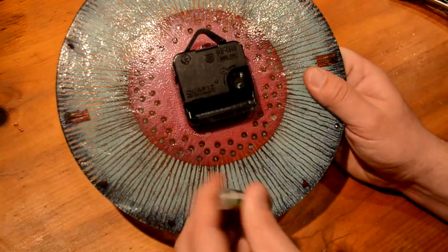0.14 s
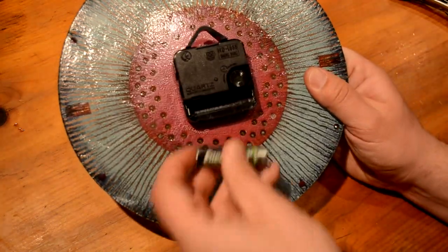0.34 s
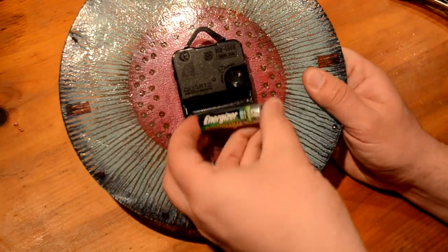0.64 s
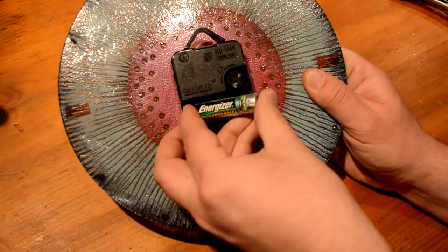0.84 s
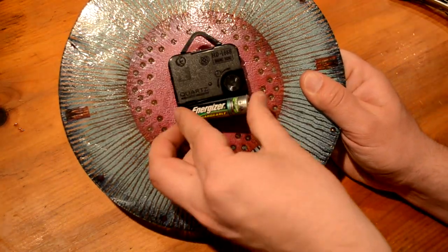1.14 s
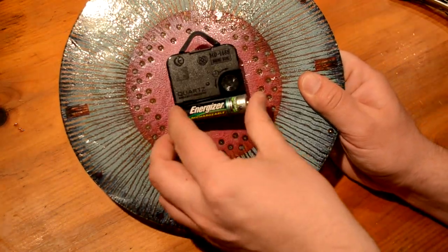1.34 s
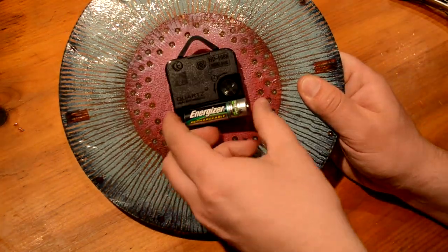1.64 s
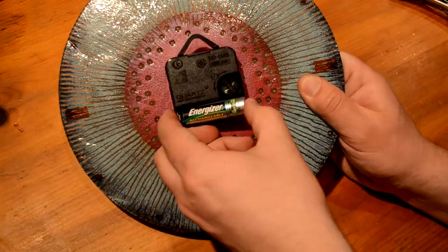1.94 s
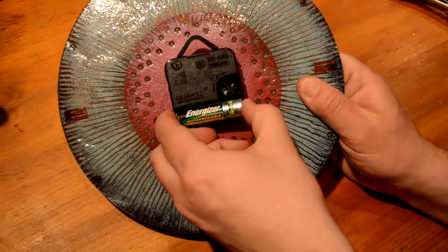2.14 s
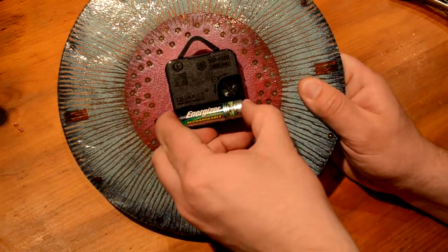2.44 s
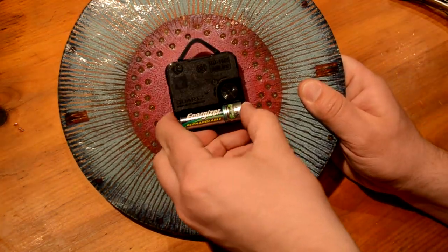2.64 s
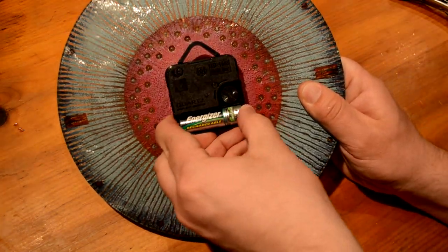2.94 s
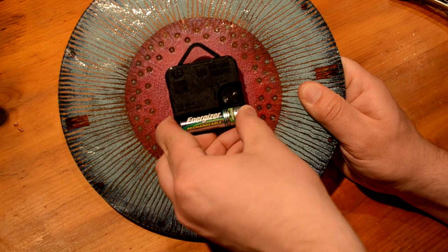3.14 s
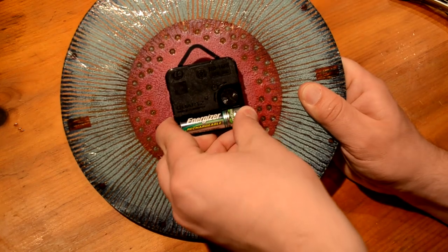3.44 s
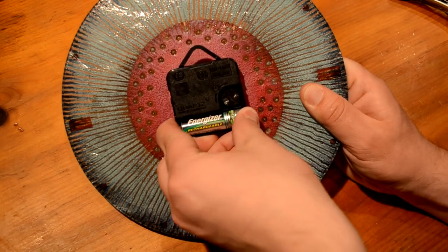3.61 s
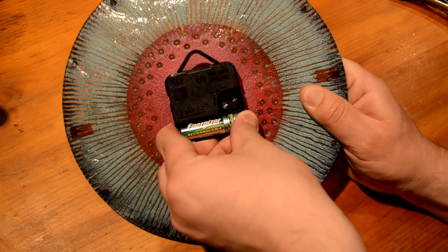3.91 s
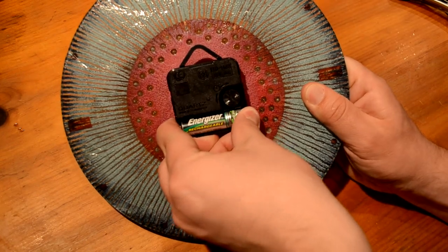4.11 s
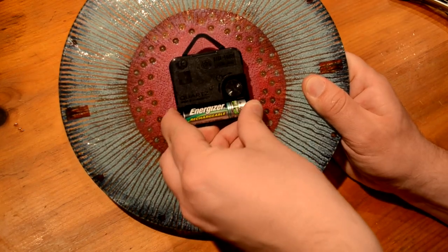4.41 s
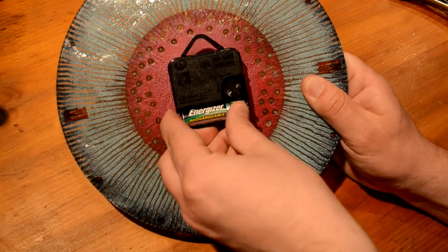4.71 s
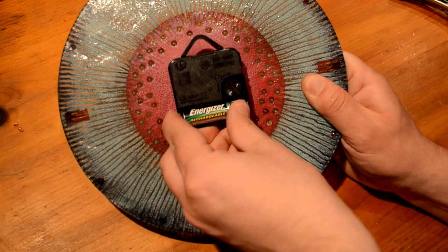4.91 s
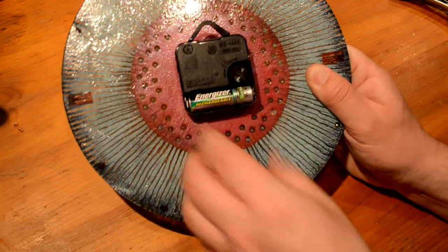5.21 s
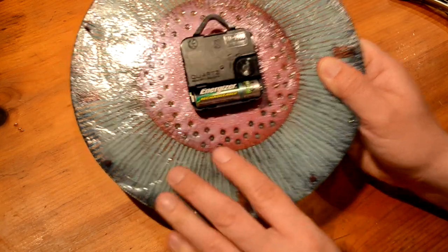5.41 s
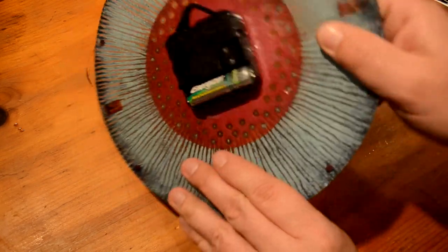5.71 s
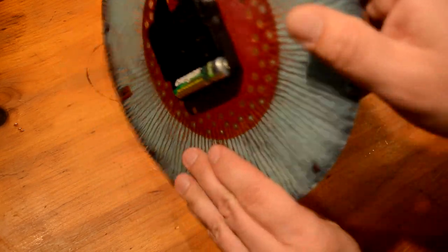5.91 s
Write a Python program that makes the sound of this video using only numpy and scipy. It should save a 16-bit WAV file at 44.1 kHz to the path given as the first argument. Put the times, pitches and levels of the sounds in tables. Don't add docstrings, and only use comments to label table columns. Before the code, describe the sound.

Fingers fumble a battery into a plastic clock case fixed to a ceramic dish held over a wooden bench. Dry, hand-muffled knocks and sharp plastic and spring clicks arrive at uneven spacing, the loudest about two thirds through, rocking the rim softly on wood. Quiet clicks follow, then a small glazed ring at the end. Close microphone, short small-room reflections, steady low fan noise, thin high whine and a receding motor drone.

```python
import sys
import numpy as np
from scipy import signal
from scipy.fft import rfft, irfft, next_fast_len
from scipy.io import wavfile
from scipy.ndimage import map_coordinates

SR = 44100
rng = np.random.default_rng(int(sys.argv[2]) if len(sys.argv) > 2 else 0)


def convert_level_to_amplitude(level_db):
    exponent = np.asarray(level_db, float) / 20
    return 10 ** exponent


def master(y):
    cut = np.clip(np.atleast_2d(y).T, -1, 1)
    pcm = np.round(cut * 32767)
    wavfile.write(sys.argv[1], SR, pcm.astype(np.int16))


N = 267246


def unit(x):
    return x / np.sqrt(np.mean(x ** 2) + 1e-20)


def along(points, hz):
    point_hz, value = np.transpose(points)
    return np.interp(np.log(hz + 1), np.log(point_hz + 1), value)


def filtered(x, response):
    m = next_fast_len(len(x) + 2048)
    return irfft(rfft(x, m) * response(np.fft.rfftfreq(m, 1 / SR)), m)[:len(x)]


def resonance(f, hz, width_hz):
    return 1j * f * width_hz / (hz * hz - f * f + 1j * f * width_hz)


def ring(modes, t, scatter_db):
    luck = rng.standard_normal(len(modes))
    total = 0
    for (hz, level_db, t60_s), u in zip(modes, luck):
        total = total + convert_level_to_amplitude(level_db + scatter_db * u - 60 * t / t60_s) * np.sin(2 * np.pi * hz * t)
    return total


def room(x, wet_db, scatter):
    # hz, t60_s
    room_decay = [(200, 0.28), (1000, 0.19), (4000, 0.19), (9000, 0.19), (15000, 0.11)]
    hz, t, z = signal.stft(rng.standard_normal(len(x)), SR, nperseg=256)
    fade = convert_level_to_amplitude(-60 * t / along(room_decay, hz)[:, None]) + scatter * convert_level_to_amplitude(-60 * t / 0.033)
    tail = signal.istft(z * fade, SR, nperseg=256)[1][:len(x)]
    tail = tail * np.clip(np.arange(len(tail)) / SR / .006 - .5, 0, 1)
    return x + convert_level_to_amplitude(wet_db) * signal.fftconvolve(x, tail / np.linalg.norm(tail))[:len(x)]


def add(track, start_s, x):
    track[round(start_s * SR):][:len(x)] += x


def background():
    # hz, level_db (per Hz)
    air_color = [(12, -33.5), (20, -3), (22, -14.5), (42, -30), (66, -10), (124, -2), (357, -7), (445, -7),
                 (889, -7), (966, -2.5), (1270, -7), (2930, -17), (5690, -30.5), (13100, -39),
                 (15000, -63.5)]
    # pitch_hz, width_hz, level_db
    fan_bands = [(967, 63, -69.5), (2954, 190, -77), (3466, 55, -79.5), (1203, 43, -79.5), (212, 28, -77)]
    # pitch_hz, level_db (rms)
    steady_tones = [(118.4, -80), (15665, -77.0)]
    # time_s, level_db
    drone_path = [(0.0, -65.5), (0.15, -63.5), (0.29, -60), (0.99, -65), (1.79, -69), (2.13, -71),
                  (2.34, -71.5), (4.39, -73), (6.06, -75)]

    def noise(response):
        return unit(filtered(rng.standard_normal(N), response))

    t = np.arange(N) / SR
    drone_db = np.interp(t, *np.transpose(drone_path))
    air_db = -60.4 + 0.083 * (drone_db - drone_db.mean())
    sway_db = 0.8 * map_coordinates(rng.standard_normal(30), [4 * t])
    air = noise(lambda f: convert_level_to_amplitude(along(air_color, f)))
    fan = sum(convert_level_to_amplitude(db) * noise(lambda f: resonance(f, hz, width) ** 2) for hz, width, db in fan_bands)
    drone = noise(lambda f: resonance(f, 150, 36) ** 2 + 0.21 * resonance(f, 62, 40) ** 2)
    tones = sum(np.sqrt(2) * convert_level_to_amplitude(db) * np.sin(2 * np.pi * hz * t) for hz, db in steady_tones)
    return convert_level_to_amplitude(air_db - 0.02) * air + convert_level_to_amplitude(air_db + 60.5) * fan + convert_level_to_amplitude(drone_db + sway_db) * drone + tones


def knocked_dish():
    # start_s, peak_db, bowl_hz, upper_db, hold_s (until the hand stops the tone)
    touches = [
        (0.684, -22.5, 796, -2.5, 0.0096),
        (0.7372, -38.5, 805, -6, 0.0068),
        (.8727, -35, 860, -12, 0.0041),
        (1.1139, -20.5, 840, -2, 0.0054),
        (1.1205, -32, 800, -19, 0.008),
        (3.067, -53, 990, 10, 0.014),
        (5.0794, -43.5, 856, 2, 0.0037),
        (5.0951, -53, 816, 3, 0.0057),
    ]
    # start_s, peak_db, bowl_hz, upper_db, hold_s
    pushes = [(1.4393, -16.5, 912, -2.5, 0.0046), (1.4425, -30, 760, -19, 0.013),
              (2.3636, -27, 923, -5.5, 0.0042), (2.4944, -9, 802, -3.5, 0.01),
              (2.499, -35, 802, 24.5, .004), (3.2055, -23.5, 960, -2.5, 0.0056),
              (3.9756, 1.5, 839, -0.5, 0.0076), (4.2337, -35.5, 830, 10, 0.01),
              (4.2947, -35, 856, 0.5, 0.0084), (4.5197, -36, 836, -2.5, 0.008),
              (5.9688, -41.5, 788, -3, 0.009)]
    # start_s, peak_db, bowl_hz
    fumbles = [
        (1.02, -45, 863),
        (1.029, -41.5, 830),
        (1.0591, -43, 950),
        (1.08, -47, 1010),
        (1.098, -47, 910),
        (3.1875, -41.5, 850),
        (3.213, -52, 912),
        (3.23, -50, 1000),
    ]
    # pitch_hz, level_db, t60_s
    upper_modes = [(1432, 12, 0.006), (1063, -18, 0.099), (1283, -16.5, 0.052), (1515, -23.5, 0.029),
                   (1620, -19, 0.046), (1800, -24, 0.12), (2079, -23.5, 0.032), (2230, -18.5, 0.02)]
    # pitch_hz, level_db, t60_s
    thud_modes = [(121.8, -13.5, 0.016), (254, -9, 0.083), (343, 3, 0.055), (384, 3.5, 0.023),
                  (450, 0.5, 0.074), (489, 1, 0.1), (605, -9, .04)]
    # pitch_hz, level_db, t60_s
    linger_modes = [(769, -4.5, .15), (775.3, -4.5, .2), (802, -4.5, .18), (830, -5.5, 0.33),
                    (829, -11.5, 0.46), (876, -2.5, 0.39), (857, -9.5, 0.26), (926, 5.5, 0.13),
                    (950, -7, 0.18)]
    touch_thud_db, push_thud_db = -28.5, -21
    fumble_upper_db, fumble_hold_s = 0.5, 0.0071

    def bowl(f):
        return (1j * f / (420 + 1j * f)) ** 2

    out, t = np.zeros(N + SR), np.arange(SR * 2 // 7) / SR
    light = touches + [(*row, fumble_upper_db, fumble_hold_s) for row in fumbles]
    knocks = [(*row, push_thud_db) for row in pushes] + [(*row, touch_thud_db) for row in light]
    for start_s, peak_db, bowl_hz, upper_db, hold_s, thud_db in knocks:
        rise = 1 - np.exp(-t / 0.00095)
        grip = 1 / (1 + (t / max(hold_s, .002)) ** 8)
        tone = grip * (1 - np.exp(-t / .0013)) * np.sin(2 * np.pi * bowl_hz * t)
        upper = convert_level_to_amplitude(upper_db - 0.5) * ring(upper_modes, t, scatter_db=4.0)
        thud = convert_level_to_amplitude(thud_db - 9) * ring(thud_modes, t, scatter_db=1.5)
        loosened = [(hz, db, t60_s * convert_level_to_amplitude(0.34 * peak_db)) for hz, db, t60_s in linger_modes]
        linger = convert_level_to_amplitude(-24 + 0.22 * peak_db) * (1 - grip) * ring(loosened, t, scatter_db=4.5)
        knock = filtered(rise * (tone + upper + linger), bowl) + rise * thud
        add(out, start_s, -convert_level_to_amplitude(peak_db - 2.0) * room(knock, wet_db=-12.5, scatter=0.046))
    return out[:N]


def holder():
    # start_s, case_hz, case_db, metal_db
    clicks = [(0.684, 3070, -42, -65), (1.0590, 4760, -52.5, -66), (1.0996, 3000, -55, -57),
              (1.1124, 2520, -66, -62), (1.437, 4660, -35.5, -42), (1.441, 3100, -35.5, -33.5),
              (2.363, 3230, -45.5, -47.5), (2.495, 2730, -18.5, -13), (2.5012, 1876, -17.5, -34),
              (3.0674, 4800, -65, -74), (3.2061, 2240, -30.5, -38.5), (3.9746, 4100, -37, -50),
              (3.9760, 3575, -11.5, -12), (4.2335, 1920, -34.5, -38.5), (4.2958, 3450, -45.5, -67),
              (5.0795, 2300, -52, -68), (5.0931, 2090, -46.5, -67), (5.9681, 3180, -45.5, -50),
              (5.099, 4890, -65, -71)]
    spring, contact = (5700, 5500, 5000), (11500, 11000, 7400)
    out, t = np.zeros(N + SR), np.arange(SR // 6) / SR
    for start_s, case_hz, case_db, metal_db in clicks:
        contact_db = 1.5 + 1.25 * metal_db
        levels = case_db, metal_db, contact_db
        shapes = [(case_hz, 1.2 * case_hz, case_hz), spring, contact]
        chatter = 0.31 * convert_level_to_amplitude(-60 * t / 0.01) * rng.standard_normal(len(t))
        for level_db, (hz, width_hz, ring_hz) in zip(levels, shapes):
            def body(f):
                return resonance(f, hz, width_hz) ** 4 + 1.6 * resonance(f, ring_hz, 930) ** 2

            crack = filtered(-1. * (t == 0), body)
            click = room(crack, wet_db=-3.5, scatter=2.5) + filtered(chatter, body)
            add(out, start_s, convert_level_to_amplitude(level_db - 1.5) / np.abs(crack).max() * click)
    return out[:N]


def scuffs():
    # start_s, length_s, level_db
    rubs = [
        (1.02, .09, -73),
        (3.068, 0.031, -69),
        (5.049, 0.016, -74),
        (5.079, .03, -70),
    ]
    # pitch_hz, width_hz, level_db
    skin_color = [(1430, 1440, 4), (2600, 480, -19), (4550, 300, -2)]
    slips_per_s, slip_scatter_db = 500, 2
    slips = np.zeros(N)
    for start_s, length_s, level_db in rubs:
        at, size, side = rng.random((60, 3))[:round(slips_per_s * length_s)].T
        strength = convert_level_to_amplitude(level_db + 31 - slip_scatter_db * np.log(size))
        slips[((start_s + at * length_s) * SR).astype(int)] += strength * (1 - at) * np.sign(side - .5)
    rub = filtered(slips, lambda f: sum(convert_level_to_amplitude(db) * resonance(f, hz, width) ** 2 for hz, width, db in skin_color))
    echo = room(np.eye(1, SR // 8)[0], wet_db=-3, scatter=1.4)
    return rub + signal.fftconvolve(rub, echo)[:N]


def bench():
    # start_s, peak_db
    bumps = [
        (1.4385, -58),
        (2.495, -62),
        (3.189, -58),
        (3.9752, -37),
        (4.003, -36.5),
        (4.017, -34),
    ]
    # pitch_hz, level_db, t60_s
    bump_modes = [(55, -4, 0.015), (119.33, -2.5, 0.0099), (242, -0.5, 0.02), (344, -2.5, .05),
                  (450, 1.5, 0.1)]
    out, t = np.zeros(N + SR), np.arange(SR // 6) / SR
    for start_s, peak_db in bumps:
        bump = (1 - np.exp(-t / 0.0017)) * ring(bump_modes, t, scatter_db=3)
        add(out, start_s, -convert_level_to_amplitude(peak_db) * room(bump, wet_db=-15.5, scatter=.3))
    return out[:N]


def tapped_dish():
    # start_s, peak_db
    taps = [
        (5.9690, -41.5),
        (6.049, -57),
    ]
    # pitch_hz, level_db, t60_s
    free_modes = [(1857, 2, 0.1), (1887, -4, 0.24), (1955, -0.5, 0.034), (3000, -17, 0.047),
                  (3230, -14, 0.18), (4450, -7, 0.026), (5060, -11, 0.036), (5620, -11, .015),
                  (5940, -18, .03), (6700, -30, .05), (7400, -14.5, 0.044), (8930, -33, 0.05)]
    out, t = np.zeros(N + SR), np.arange(SR * 2 // 7) / SR
    for start_s, peak_db in taps:
        tap = ring(free_modes, t, scatter_db=1)
        add(out, start_s, convert_level_to_amplitude(peak_db - 2.5) * room(tap, wet_db=-12.5, scatter=0.52))
    return out[:N]


def scene():
    return (background() + knocked_dish() + holder() + scuffs() + bench() + tapped_dish())[None]


def band_limit(x):
    return signal.sosfilt(signal.butter(12, 16540, fs=SR, output="sos"), x)


def record(dry):
    heard = filtered(dry[0], lambda f: 1 / (1 + (f / 15900) ** 40))[None]
    mix = heard / (1 + np.abs(heard / 1.05) ** 5) ** (1 / 5) + .0006
    return band_limit(mix)


dry = scene()
out = record(dry)
master(out)
```